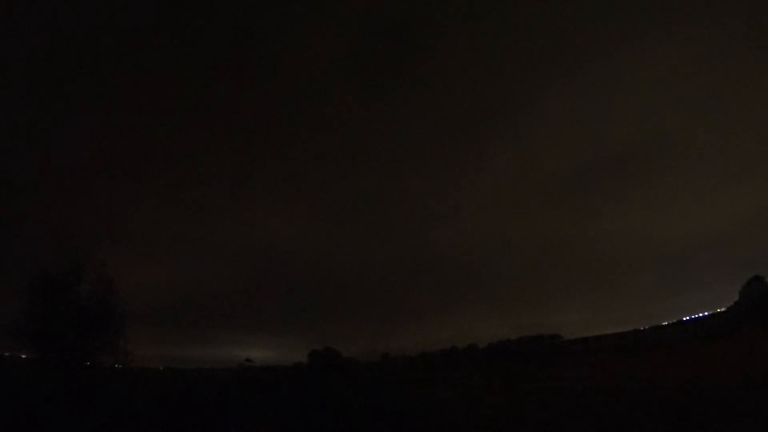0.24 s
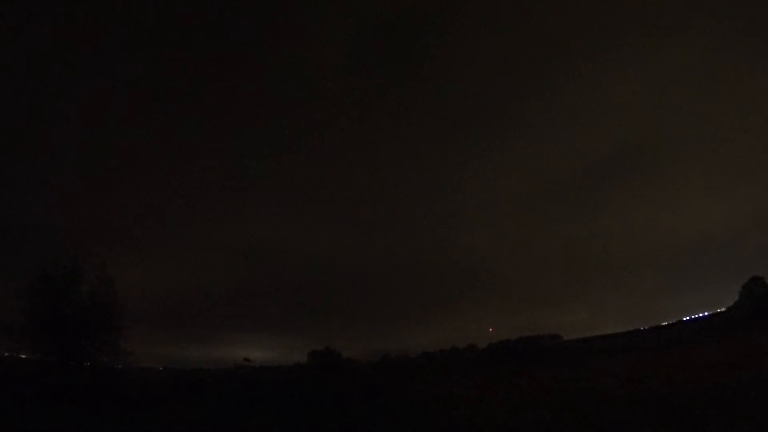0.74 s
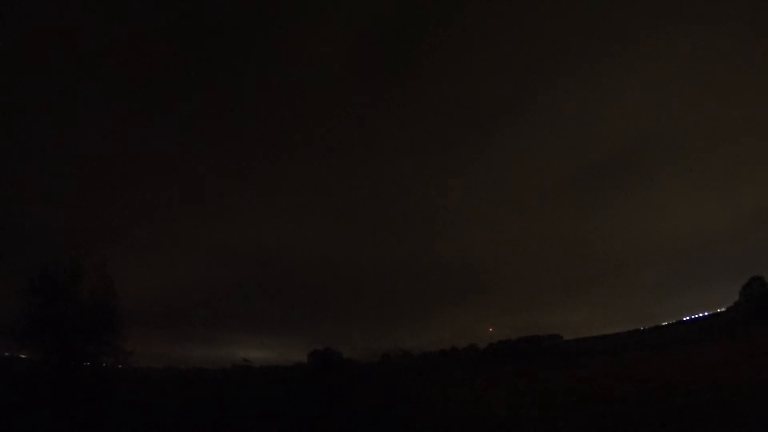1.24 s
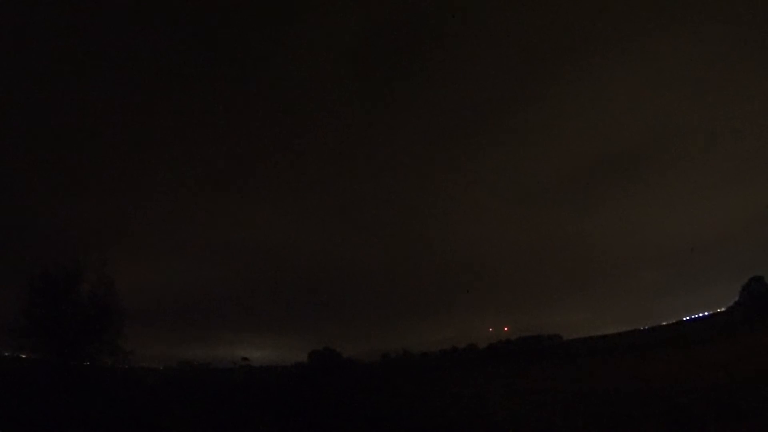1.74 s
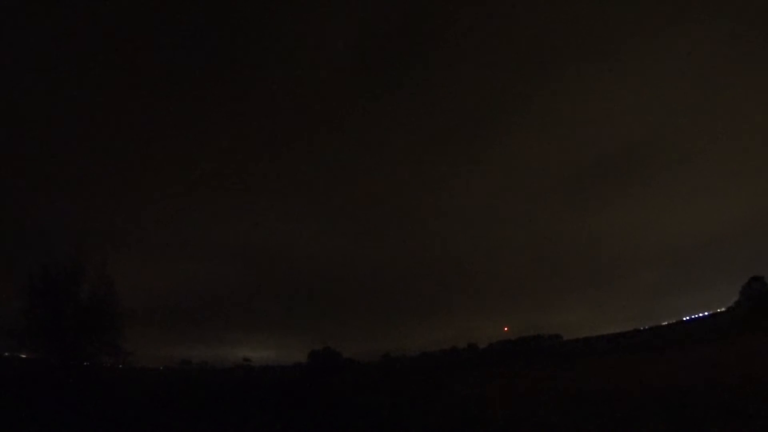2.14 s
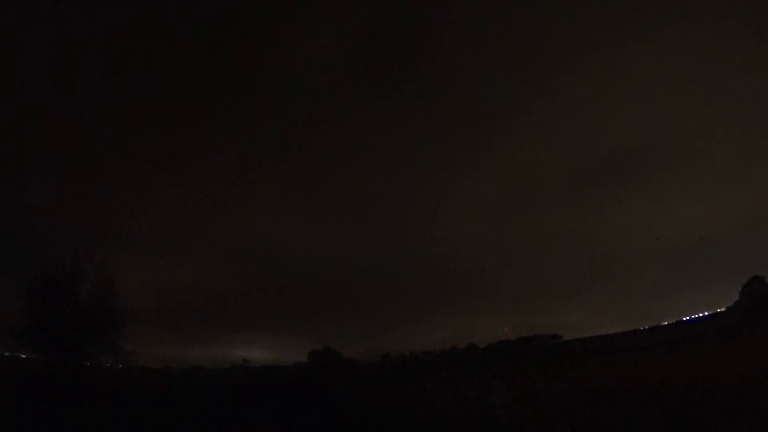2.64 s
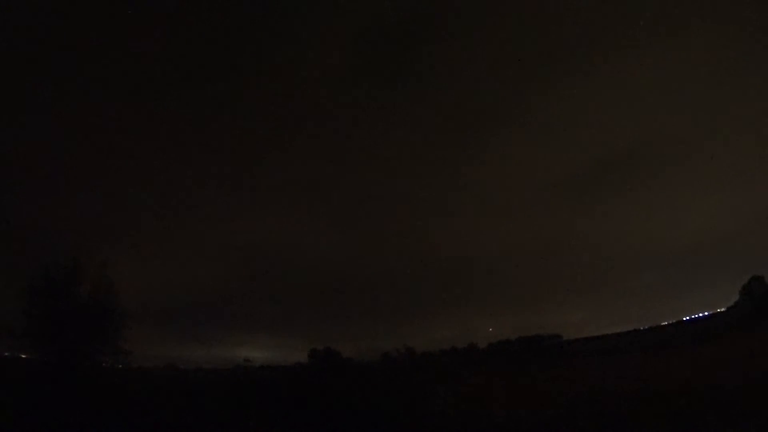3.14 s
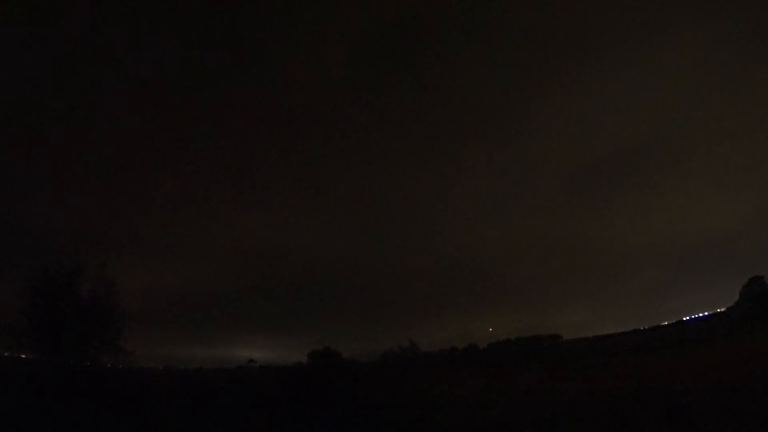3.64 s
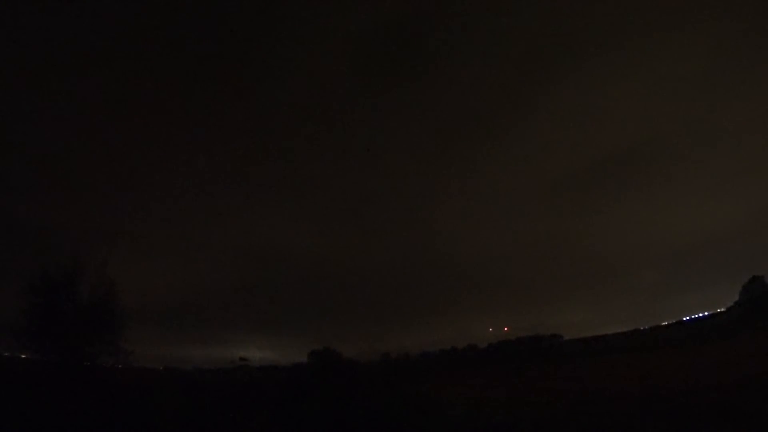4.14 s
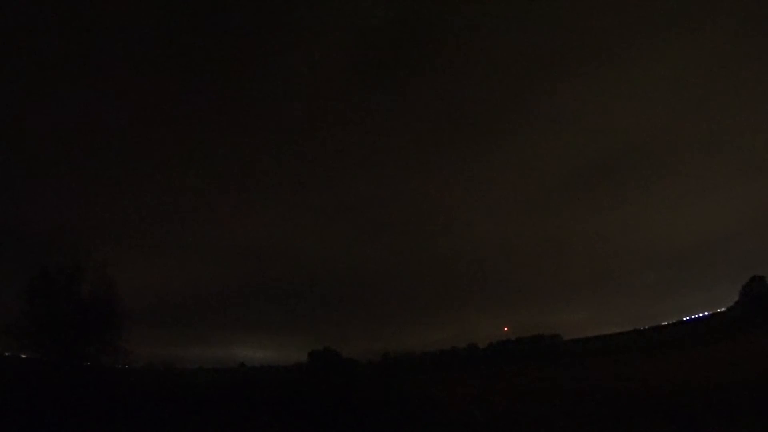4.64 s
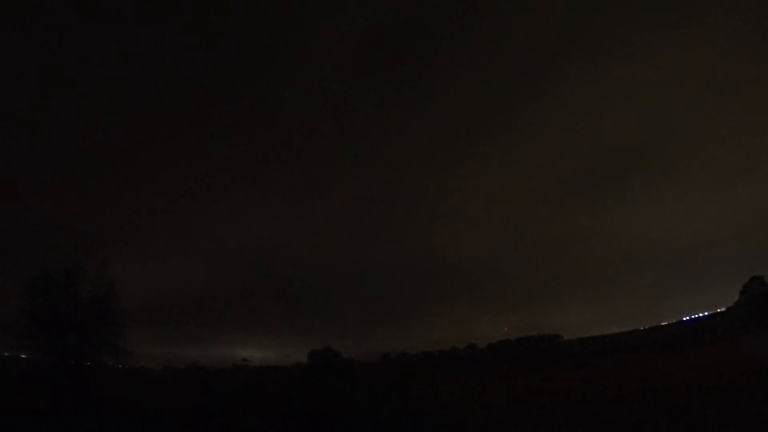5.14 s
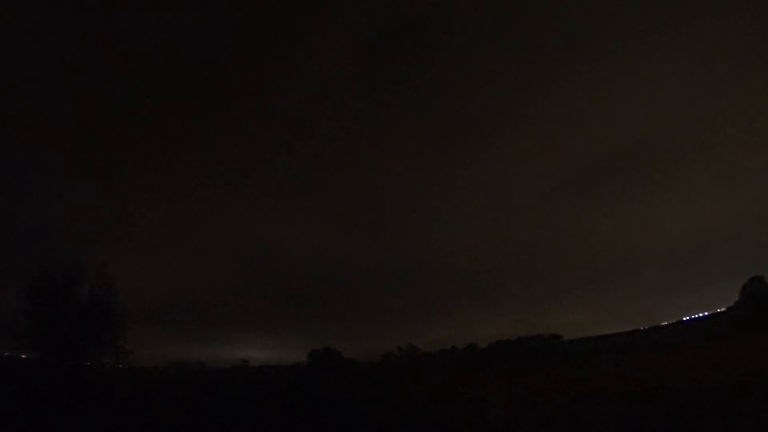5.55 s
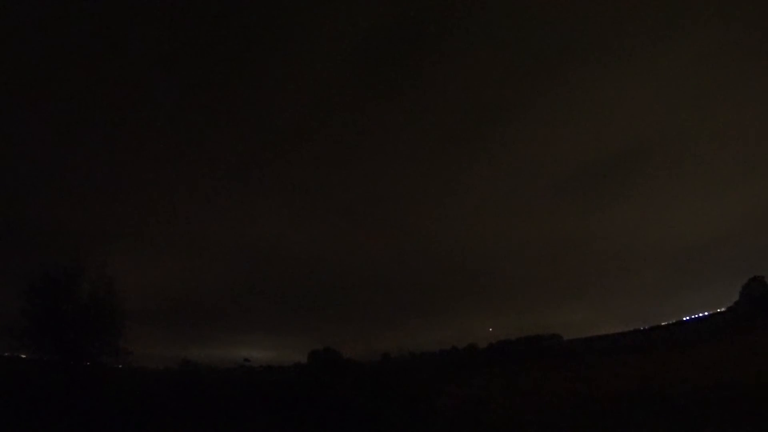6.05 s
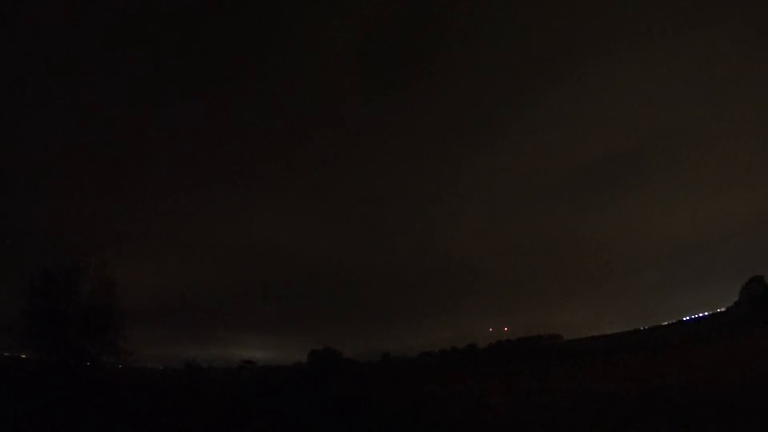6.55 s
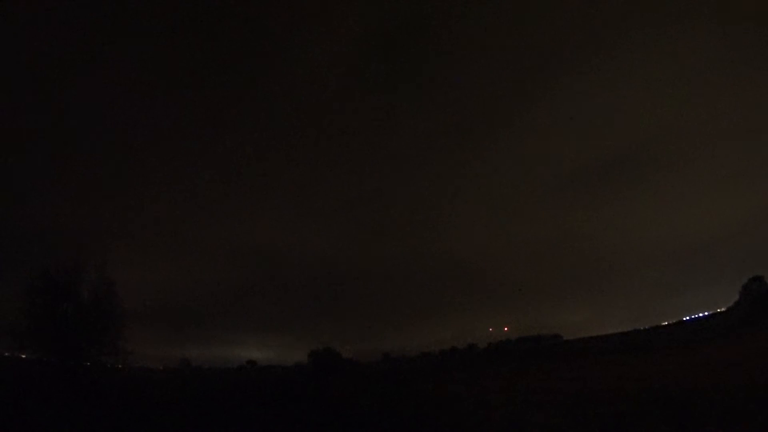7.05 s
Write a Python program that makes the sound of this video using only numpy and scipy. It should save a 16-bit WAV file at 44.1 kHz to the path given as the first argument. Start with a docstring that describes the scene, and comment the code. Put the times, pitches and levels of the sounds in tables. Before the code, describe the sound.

A quiet, high-pitched chorus of night insects fills an open field, heard in stereo and leaning slightly left. Crickets trill and chirp throughout under a thin, swelling buzz. A katydid ticks rapidly and drops away past the middle, while another starts rasping in bursts. Faint hiss, a low electrical hum and soft wind on the microphone sit beneath, and one sharp, close click comes just before the end.

```python
"""Tree crickets trill in a field at night, one near the stereo microphone and a chorus behind it.
Around them coneheads buzz, katydids tick and rattle, and field crickets chirp. Each song is a train of
wing strokes, a scraper drawn over a file, nearly all sliding down in pitch; grass and bushes scatter it.
Underneath lie far hiss, mains hum and light wind on the microphone; near the end, one click close by."""
import sys
import numpy as np
from scipy import signal
from scipy.fft import rfft, irfft, next_fast_len
from scipy.io import wavfile

SR = 44100
rng = np.random.default_rng(int(sys.argv[2]) if len(sys.argv) > 2 else 0)


def write(x):
    x = np.atleast_2d(x).T
    wavfile.write(sys.argv[1], SR, np.round(np.clip(x, -1, 1) * 32767).astype(np.int16))


N = 321470
TIME = np.arange(N) / SR

# tree cricket chorus at the microphone: t/s, level/dB
TRILL_LEVEL = [(0, -48), (1.1, -48), (1.5, -50), (4.3, -48), (5.1, -50.5), (5.9, -51.5), (6.4, -50),
               (7.29, -49)]
# conehead buzz, swelling as the singers turn: t/s, low band/dB, middle band/dB, high band/dB
BUZZ_LEVELS = [(0.0, -56, -59, -63), (0.12, -56.5, -53, -66), (0.99, -54, -52.5, -58),
               (1.62, -59.5, -58.5, -61), (2.54, -58.5, -53.5, -63), (2.9, -54.5, -60, -58.5),
               (3.04, -51, -49.5, -58), (3.35, -58.5, -55, -62), (3.71, -50.5, -52, -62),
               (4.08, -57, -55, -59), (4.3, -55, -54.5, -55), (4.48, -59, -55.5, -64),
               (5.36, -55.5, -55.5, -59.5), (5.74, -59.5, -57.5, -60), (6.31, -56, -56, -58),
               (6.6, -59, -62, -63), (7.15, -57.5, -62.5, -65), (7.29, -61, -58, -67)]
# ticking katydid, falling quiet at about 5 s: t/s, level/dB
TICK_LEVEL = [(0, -59), (3.3, -60), (4.87, -60), (5, -75), (7.29, -71)]
# rattling katydid, coming in bursts: t/s, low rasp/dB, high rasp/dB
RATTLE_LEVELS = [(0, -77, -72), (1.5, -77, -72), (2.1, -59, -60), (2.7, -61, -66), (2.9, -56, -63),
                 (3.3, -59.5, -61), (4.05, -57.5, -57), (4.3, -59, -64), (4.7, -54.5, -54.5),
                 (4.95, -60, -67), (5.5, -62, -70), (5.8, -60, -61.5), (6.3, -60.5, -62.5), (6.7, -64, -60),
                 (7.29, -66, -60.5)]
# katydids far out in the field: t/s, level/dB
FAR_KATYDID_LEVEL = [(0, -62), (1.8, -62.5), (2.3, -58.5), (4.7, -58), (5.4, -71), (6, -66), (7.29, -61)]
# how far each of four near singers runs ahead of an even beat: t/s, lead/strokes
TRILLER_LEAD = [(0, .22), (1.5, 0), (1.8, .29), (2.9, .15), (3.6, .32), (4, .3), (5.3, .54), (7.29, .62)]
CONEHEAD_LEAD = [(0, .34), (.5, .39), (1, .17), (1.5, .25), (1.9, -.13), (2.5, -.02), (3.5, .62),
                 (4.8, .65), (5.5, .86), (6, .76), (6.5, .88), (7.29, .38)]
TICKER_LEAD = [(0, -.29), (1.2, -.31), (2.3, -.39), (3.2, -.33), (4.85, -.08), (7.29, -.08)]
RATTLER_LEAD = [(0, .1), (2, -.21), (3.2, -.33), (5.1, -.14), (5.8, -.22), (6.4, -.58), (7.29, -2.1)]
# spectrum of the far hiss: f/Hz, mid density/(dB per Hz), side density/(dB per Hz)
HISS_SPECTRUM = [(25, -114, -112), (61, -89, -101), (143, -93, -95.5), (316, -91.5, -90.5), (590, -94, -89),
                 (1350, -98, -91.5), (1614, -97.5, -95.5), (1840, -91, -91.5), (2200, -99, -96.5),
                 (3210, -85.5, -89), (3530, -96, -98.5), (5400, -98, -99), (7370, -92, -102),
                 (7940, -99, -97), (11200, -96, -100.5)]
# the hiss sinks a little: t/s, gain/dB
HISS_TRIM = [(0, 1.5), (4.8, 1.4), (5.5, 0.1), (6.7, 0), (7.29, 0.5)]
# mains hum, swelling and fading: t/s, level/dB
HUM_LEVEL = [(0, -64.5), (.35, -65), (.75, -59), (.82, -76), (.9, -65), (1.45, -74), (1.56, -62),
             (1.9, -63), (2.3, -77), (2.7, -60), (3.35, -69), (3.45, -62), (3.78, -69), (3.9, -61),
             (4.1, -63), (4.65, -70), (4.9, -62.5), (5.35, -64), (5.55, -74), (5.95, -72), (6.29, -62.5),
             (6.45, -66), (6.7, -61.5), (6.84, -73), (7.07, -61), (7.2, -76), (7.29, -67)]
# puffs of wind on the microphone: middle t/s, length/s, level/dB
WIND_PUFFS = [(.37, 0.28, -59), (0.597, .2, -60.5), (.88, .1, -58), (1.233, 0.53, -64.5), (2.232, .3, -63),
              (4.85, .4, -66), (6.268, 0.27, -58.5), (7.28, 0.12, -62)]
# the nearer field crickets: f/Hz, pulses per chirp, pulse spacing/s, left minus right/dB
CRICKET_VOICES = [(4885, 3, .086, 4), (4615, 2, .099, 8), (4070, 3, .07, 3)]
# their chirps: first pulse t/s, f/Hz, typical peak level/dB
CRICKET_CHIRPS = [(.251, 4885, -57), (.877, 4885, -62), (1.471, 4885, -56), (2.146, 4885, -58),
                  (2.745, 4860, -59), (3.347, 4885, -58), (3.932, 4885, -57), (4.492, 4885, -57),
                  (5.122, 4885, -59), (5.694, 4900, -60), (6.26, 4885, -60), (6.878, 4885, -66),
                  (.252, 4650, -60), (.632, 4650, -67), (1.586, 4615, -60), (2.66, 4600, -54),
                  (3.352, 4600, -55.5), (4.641, 4630, -52.5), (5.657, 4615, -59), (6.607, 4615, -56),
                  (1.414, 4070, -57.5), (1.943, 4070, -56.5), (2.483, 4040, -60)]
# modes of the small hard part that clicks: f/Hz, relative level/dB, t60/s
SNAP_MODES = [(1920, 0, 0.023), (1450, -28, 0.0052), (2500, -1, .007), (3300, -17, 0.0073),
              (4240, 3, 0.003)]


def from_db(db):
    """Decibels to gain."""
    return 10 ** (np.asarray(db) / 20)


def pan(db):
    """Left and right offsets in dB; positive db favours the left."""
    return np.array([[db / 2], [-db / 2]])


def rms_one(x):
    """Scale to rms 1."""
    return x / np.sqrt(np.mean(x ** 2) + 1e-20)


def in_time(rows):
    """Columns of a curve table, one value per sample."""
    s, *columns = np.transpose(rows)
    return [np.interp(TIME, s, c) for c in columns]


def low_noise(hz):
    """Noise below hz; rms 1."""
    lowpass = signal.butter(2, hz, fs=SR, output="sos")
    return rms_one(signal.sosfilt(lowpass, rng.standard_normal(N + 4000))[4000:])


def gate(beat, duty, swell):
    """Position 0-1 within each stroke and its envelope; swell over 1 peaks late and ends abruptly."""
    at = np.minimum((beat + duty / 2) % 1 / duty, 1).astype(np.float32)
    return at, np.sin(np.float32(np.pi) * at ** np.float32(swell)) ** 2


def strokes(beat, from_hz, to_hz, duty, swell, rough, rough_hz):
    """One tone burst per wing stroke, gliding with the scraper's speed; uneven file teeth roughen it."""
    at, envelope = gate(beat, duty, swell)
    stroke = np.floor(beat + duty / 2).astype(int)
    start = rng.random(2000)[stroke % 2000]   # each stroke sets the wing ringing afresh
    turns = (np.cumsum(from_hz + (to_hz - from_hz) * at, dtype=float) / SR + start) % 1
    teeth = 1 - np.clip(rough, 0, 1) + rough * low_noise(rough_hz)
    return rms_one(envelope * teeth * np.sin((2 * np.pi * turns).astype(np.float32)))


def singer(beat, level_db, glide_hz, duty, swell, rough, rough_hz):
    """One band of one insect's song; beat counts strokes (strokes per second times time, plus lead)."""
    return from_db(level_db) * strokes(beat, *glide_hz, duty, swell, rough, rough_hz)


def placed(x, pan_db, lag_ms, scatter_db, t60=.008):
    """Direct sound reaches the right channel lag_ms late; each side gets its own spray of echoes."""
    size, tail = next_fast_len(N + SR // 4), np.arange(SR // 20) / SR
    spray = rng.standard_normal((2, len(tail))) * from_db(-60 * tail / t60)
    spray = from_db(scatter_db) * rfft(spray / np.sqrt(np.sum(spray[0] ** 2)), size)
    delay = np.exp(-2j * np.pi * np.arange(size // 2 + 1) * SR / size * [[0], [lag_ms / 1000]])
    paths = (delay + spray) / np.sqrt(1 + from_db(2 * scatter_db))
    return irfft(rfft(x, size) * paths, size)[:, :N] * from_db(pan(pan_db))


def crowd(level_db, count, rate, rate_spread, band_hz, slide_hz, duty, rough, rough_hz,
          pan_db, lag_ms, wide_ms):
    """Many far insects of one kind, each with its own tempo, pitch and direction; rate in strokes/s."""
    out = 0
    tops_hz = np.linspace(*band_hz, count) + slide_hz / 2
    for top_hz, (tempo, side, start) in zip(tops_hz, rng.standard_normal((count, 3))):
        beat = rate * (1 + rate_spread * tempo) * TIME + start
        song = strokes(beat, top_hz, top_hz - slide_hz, duty, 1, rough, rough_hz)
        lag = round((lag_ms + wide_ms * side) * SR / 1000)
        out = out + np.array([song, np.roll(song, lag)])
    return from_db(level_db + pan(pan_db)) * rms_one(out)


def tree_crickets(trill_rate=37.4, chirp_rate=2.2):
    """A near triller before a dense chorus; a lower kind bundles its strokes into shared chirps."""
    level_db = in_time(TRILL_LEVEL)[0]
    beat = trill_rate * TIME + in_time(TRILLER_LEAD)[0]
    near_db = level_db - 5 - .16 * low_noise(.79)
    near = singer(beat, near_db, (3210, 3020), duty=.7, swell=1.1, rough=.15, rough_hz=60)
    far = crowd(level_db - .7, count=12, rate=40, rate_spread=.12, band_hz=(3003, 3151), slide_hz=189.9,
                duty=.85, rough=.3, rough_hz=50, pan_db=1.8, lag_ms=.36, wide_ms=.035)
    lower = crowd(-65.5, count=3, rate=40, rate_spread=.024, band_hz=(2422, 2430), slide_hz=90,
                  duty=.75, rough=.3, rough_hz=40, pan_db=6, lag_ms=-.05, wide_ms=.05)
    _, chirps = gate(chirp_rate * TIME - .17, duty=.65, swell=1)
    return placed(near, pan_db=1.5, lag_ms=.37, scatter_db=-10) + far + chirps * lower


def coneheads(loud_rate=177.7, left_rate=151.4, faint_rate=166.9):
    """Three near buzzers and far crowds; their fast wings radiate little below the main mode."""
    low_db, middle_db, high_db = in_time(BUZZ_LEVELS)
    takeover = np.clip((TIME - 5) / .44, 0, 1)   # from 5 s the loud one stands out of the far ones
    rise_db, sink_db = 3.5 * takeover, 2.5 * takeover
    # the loud one: an upper mode opens each stroke, the pitch glides down, the main mode ends it
    beat = loud_rate * TIME + in_time(CONEHEAD_LEAD)[0]
    glide = singer(beat + .18, middle_db + rise_db - 3, (8200, 6700),
                   duty=.4, swell=2.2, rough=.22, rough_hz=400)
    edge = singer(beat + .36, high_db + rise_db + .5, (8050, 7550),
                  duty=.5, swell=1.2, rough=.2, rough_hz=300)
    ring = singer(beat - .06, low_db + rise_db + 1.7, (6480, 6120),
                  duty=.55, swell=.9, rough=.2, rough_hz=250)
    # the other two drift off their beat at random
    left_beat = left_rate * TIME + .4 * low_noise(.5)
    left_db = low_db - 6.5 - 9 * np.maximum(TIME - 5.5, 0)   # fades 9 dB/s from 5.5 s
    left = singer(left_beat, left_db, (7200, 6100), duty=.6, swell=1, rough=.52, rough_hz=370)
    faint_beat = faint_rate * TIME + .4 * low_noise(.5)
    faint = singer(faint_beat, high_db - 9.5, (7800, 7400), duty=.55, swell=.31, rough=.32, rough_hz=300)
    far = crowd(low_db - sink_db - 3, count=4, rate=165, rate_spread=.1, band_hz=(6140, 6560),
                slide_hz=300.6, duty=.9, rough=.8, rough_hz=200, pan_db=6.5, lag_ms=.2, wide_ms=.04)
    far += crowd(middle_db - sink_db - 2, count=4, rate=180, rate_spread=.1, band_hz=(6720, 7340),
                 slide_hz=297, duty=.9, rough=.82, rough_hz=207, pan_db=-2, lag_ms=.31, wide_ms=.025)
    far += crowd(high_db - sink_db + .79, count=3, rate=170, rate_spread=.1, band_hz=(7590, 7990),
                 slide_hz=251.5, duty=.79, rough=.38, rough_hz=200, pan_db=3.5, lag_ms=.31, wide_ms=.038)
    near = placed(edge + glide + faint, pan_db=1, lag_ms=.31, scatter_db=-9)
    near += placed(ring + left, pan_db=8, lag_ms=.21, scatter_db=-9)
    return signal.sosfilt(signal.butter(6, 5800, "high", fs=SR, output="sos"), near + far)


def katydids(tick_rate=15.7, rattle_rate=39.9):
    """Near by, one alternates a tick with a high lisp and one rattles in raspy strokes; more far off."""
    beat = tick_rate * TIME + in_time(TICKER_LEAD)[0]
    tick_db = in_time(TICK_LEVEL)[0]
    tick = singer(beat, tick_db, (8190, 8040), duty=.19, swell=1.1, rough=.25, rough_hz=12)
    edge = singer(beat, tick_db - 9, (9000, 8750), duty=.2, swell=1.8, rough=.5, rough_hz=300)
    lisp = singer(beat - .65, tick_db - 3.5, (10700, 10300), duty=.43, swell=1.3, rough=.95, rough_hz=870)
    beat = rattle_rate * TIME + in_time(RATTLER_LEAD)[0]
    low_db, high_db = in_time(RATTLE_LEVELS)
    low_rasp = singer(beat, low_db + 1.5, (9900, 9100), duty=.8, swell=1.6, rough=.9, rough_hz=650)
    high_rasp = singer(beat, high_db + 1.5, (10300, 10900), duty=.8, swell=1.6, rough=.9, rough_hz=700)
    far = crowd(in_time(FAR_KATYDID_LEVEL)[0], count=5, rate=45, rate_spread=.18, band_hz=(8890, 10690),
                slide_hz=304, duty=1, rough=.97, rough_hz=406, pan_db=-1.5, lag_ms=-.012, wide_ms=.03)
    ticker = placed(tick + edge + lisp, pan_db=4.5, lag_ms=.31, scatter_db=-12)
    rattler = placed(low_rasp + high_rasp, pan_db=2, lag_ms=-.012, scatter_db=-11)
    return ticker + rattler + far


def far_field_crickets():
    """Faint wing pulses from further down the field."""
    return crowd(-70, count=9, rate=9, rate_spread=.25, band_hz=(4050, 4600), slide_hz=100,
                 duty=.25, rough=.5, rough_hz=3, pan_db=3, lag_ms=.02, wide_ms=.06)


def night_hiss():
    """Wide, distant hiss with separate mid and side colour."""
    size = next_fast_len(N)
    hz, *densities_db = np.transpose(HISS_SPECTRUM)
    log_hz = np.log(np.arange(size // 2 + 1) * SR / size + 1)
    colour = from_db([np.interp(log_hz, np.log(hz), db) for db in densities_db]) * np.sqrt(SR / 2)
    noise = irfft(rfft(rng.standard_normal((2, size))) * colour, size)[:, :N]
    mid, side = from_db(in_time(HISS_TRIM)[0]) * noise
    return mid + side * [[1], [-1]]


def mains_hum():
    """A wavering hum in the centre, with a fainter tone just under its octave."""
    hum_hz = 120 + 1.275 * low_noise(2.43)
    hum = np.sqrt(2) * from_db(in_time(HUM_LEVEL)[0]) * np.sin(2 * np.pi * np.cumsum(hum_hz) / SR)
    upper_db = -76 + 2.4 * low_noise(3.9)
    upper_hz = 235.7 + 2.57 * low_noise(3.4)
    return hum + from_db(upper_db) * np.sin(2 * np.pi * np.cumsum(upper_hz) / SR)


def microphone_wind(calm_db=-71):
    """Light air rumbles on the microphone in puffs, the same in both channels."""
    rumble = signal.sosfilt(signal.butter(2, 35, "high", fs=SR, output="sos"), low_noise(178))
    puffs = sum(from_db(db) * np.cos(np.pi * np.clip((TIME - s) / length_s, -.5, .5)) ** 2
                for s, length_s, db in WIND_PUFFS)
    return (from_db(calm_db) + puffs) * rms_one(rumble)


def field_crickets(pulse_s=.033, slide_hz=80, spread_db=1.5):
    """Chirps of two or three short, nearly pure wing pulses that sag in pitch; pitch tells who sings."""
    t = np.arange(int(pulse_s * SR)) / SR
    out = np.zeros((2, N + SR))
    for first_s, hz, peak_db in CRICKET_CHIRPS:
        _, pulses, spacing_s, pan_db = min(CRICKET_VOICES, key=lambda voice: abs(voice[0] - hz))
        sweep = (hz + slide_hz / 2) * t - slide_hz * t ** 2 / (2 * pulse_s)
        for k, (phase, right_shift, strength) in enumerate(rng.standard_normal((3, 3))[:pulses]):
            turns = sweep + phase + [[0], [.16 * right_shift]]
            at = int((first_s + k * spacing_s - pulse_s / 2) * SR)
            gain = from_db(peak_db + spread_db * strength + pan(pan_db))
            out[:, at:at + len(t)] += gain * np.hanning(len(t)) * np.sin(2 * np.pi * turns)
    return out[:, :N]


def click(at_s=6.9497, drive_db=-30.5):
    """A hard part snaps close by and rings briefly, too small for bass and too soft for high treble."""
    t = np.maximum(TIME - at_s, 0)
    ring = sum(from_db(drive_db + db - 60 * np.minimum(t, .1) / t60) * np.sin(-2 * np.pi * hz * t)
               for hz, db, t60 in SNAP_MODES)
    snap = signal.sosfilt(signal.butter(3, [1250, 5600], "band", fs=SR, output="sos"), ring)
    return placed(snap, pan_db=.1, lag_ms=.011, scatter_db=-10)


def scene():
    """The whole field as it reaches the microphone."""
    insects = tree_crickets() + coneheads() + katydids() + field_crickets() + far_field_crickets()
    return insects + night_hiss() + mains_hum() + microphone_wind() + click()


def record(dry, cutoff_hz=11010):
    """The recorder cuts the top steeply and adds a trace of converter noise."""
    cut = signal.sosfilt(signal.ellip(14, .3, 75, cutoff_hz, fs=SR, output="sos"), dry)
    return cut + from_db(-102) * rng.standard_normal(dry.shape)


dry = scene()
out = record(dry)
write(out)
```